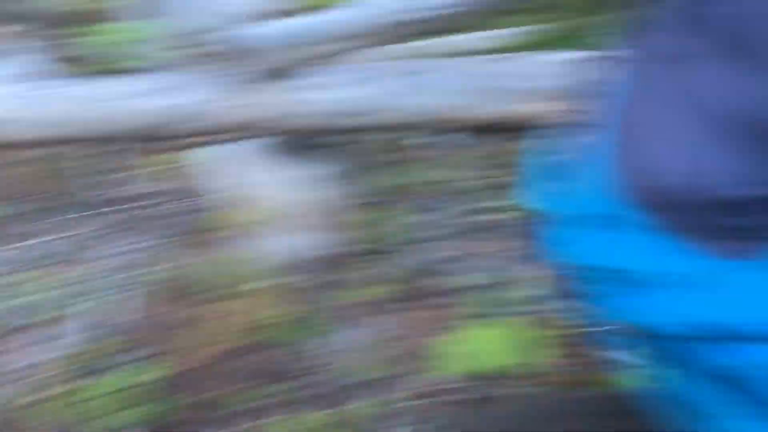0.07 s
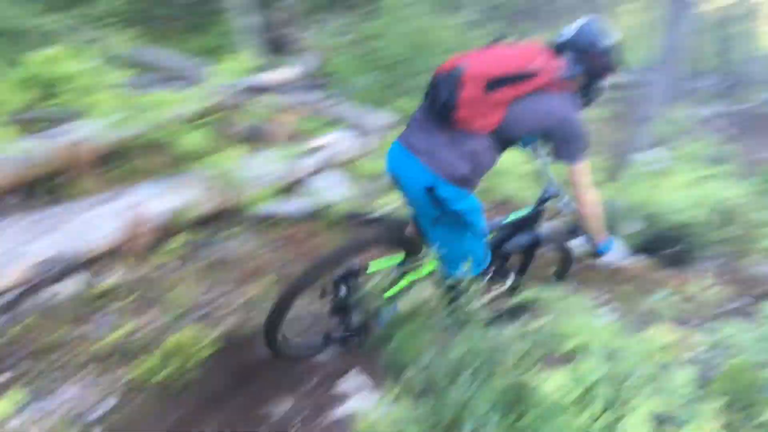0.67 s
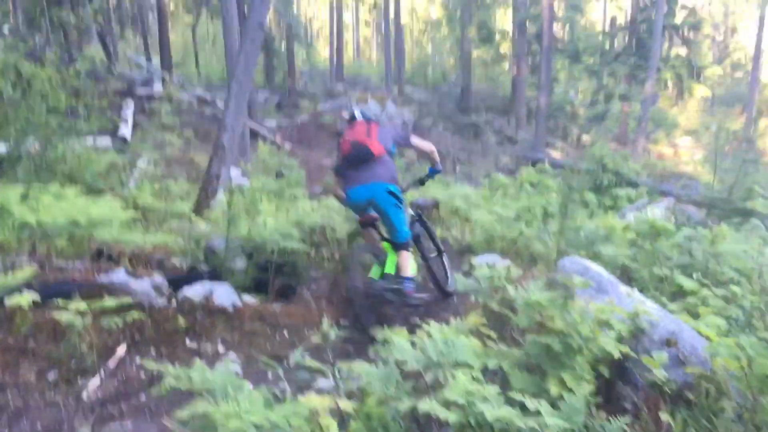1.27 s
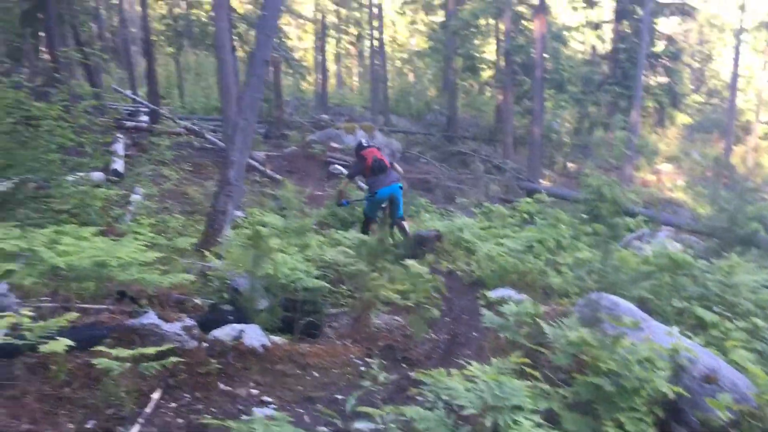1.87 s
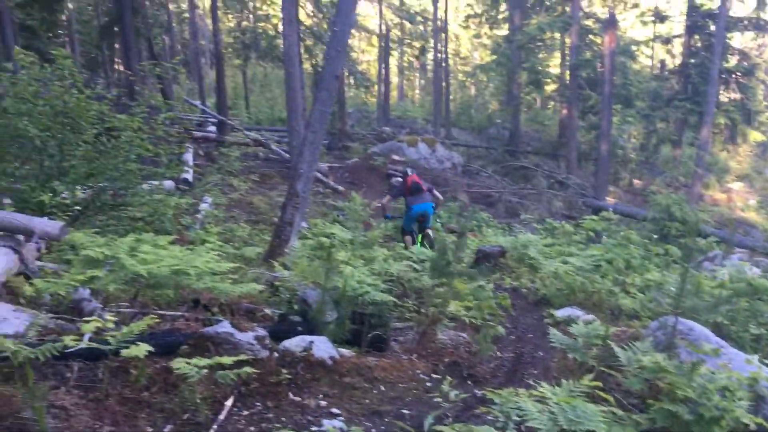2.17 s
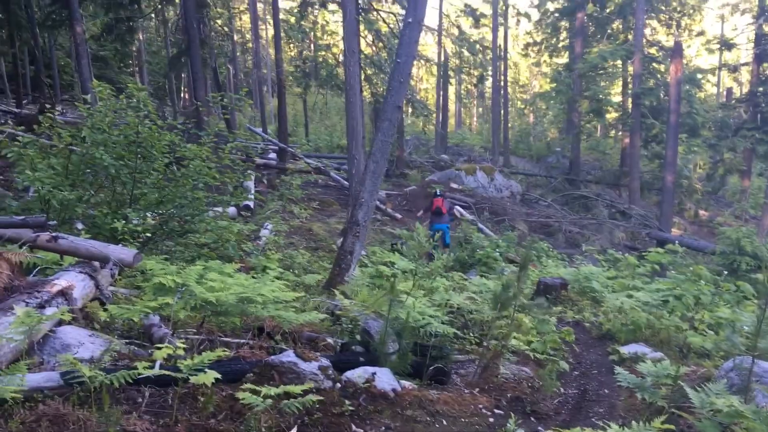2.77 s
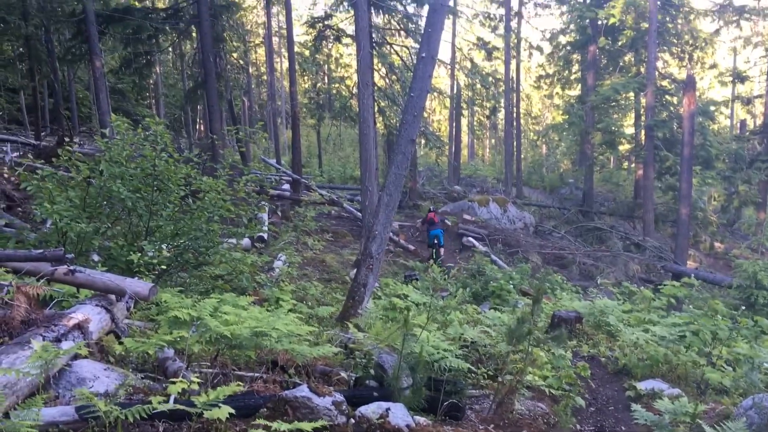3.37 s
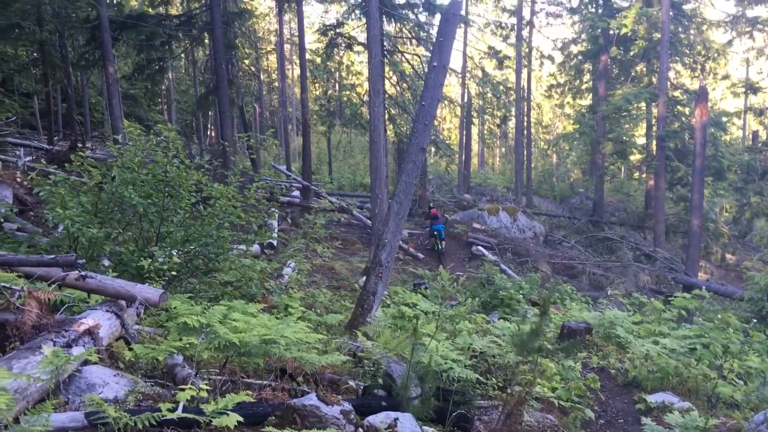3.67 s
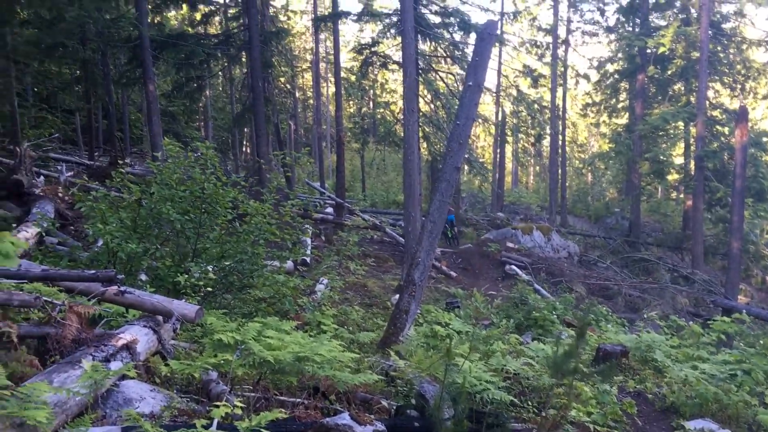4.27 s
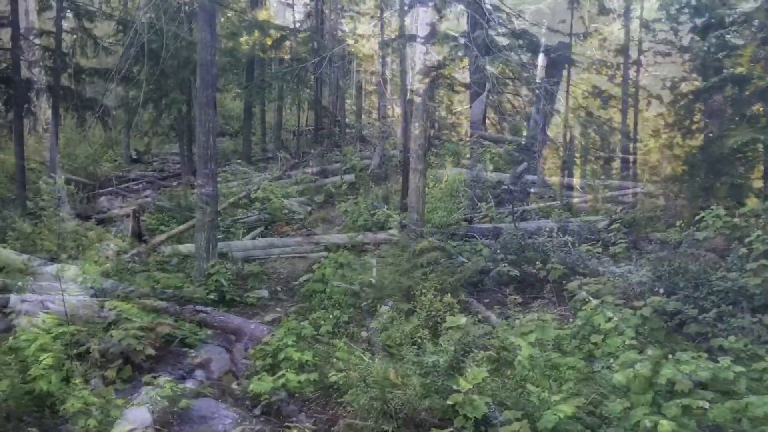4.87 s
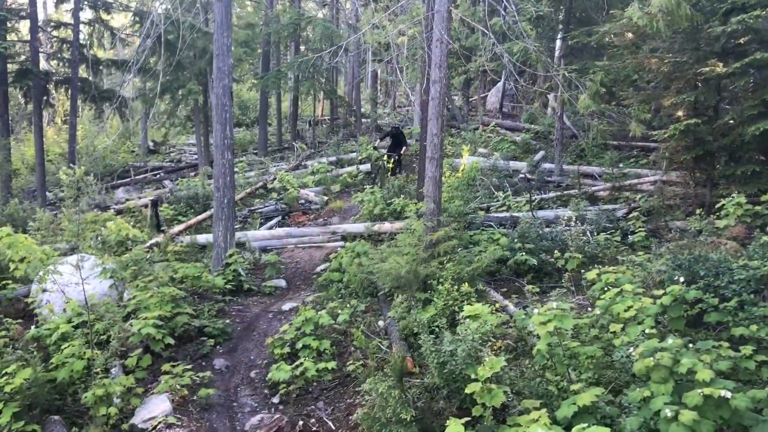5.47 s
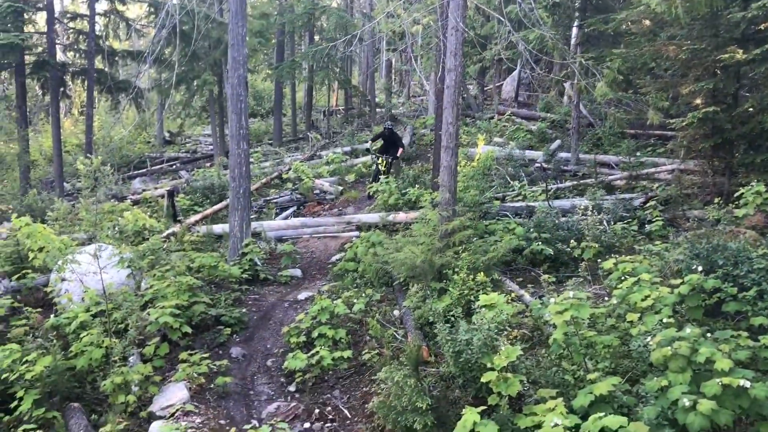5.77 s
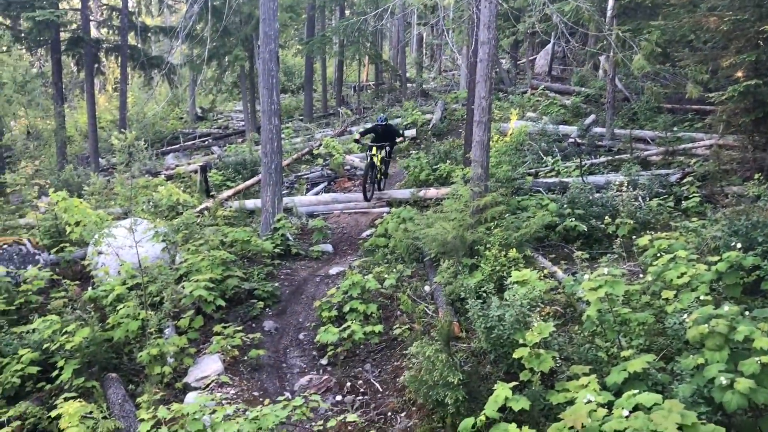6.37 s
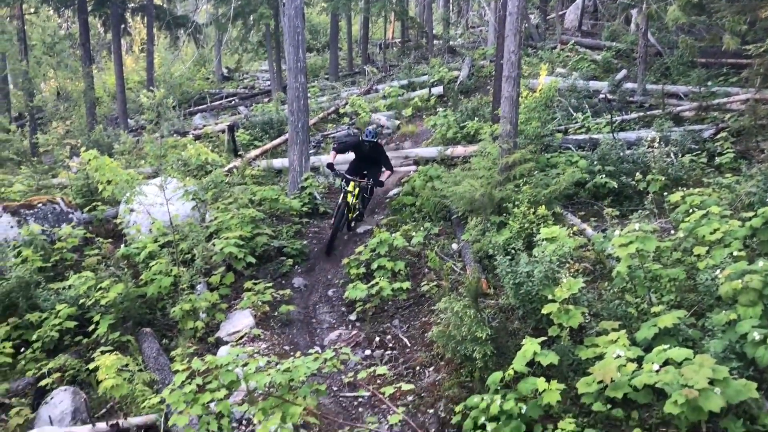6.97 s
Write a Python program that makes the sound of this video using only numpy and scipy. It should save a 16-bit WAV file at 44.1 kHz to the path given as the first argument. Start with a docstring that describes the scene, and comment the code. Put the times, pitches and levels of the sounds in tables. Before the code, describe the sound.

A mountain bike passes close to the microphone right at the start, its tyres crunching on dirt and spraying grit, with low thuds, a brief rush of air and sharp rattles, loudest around 0.3 to 0.5 seconds. It rides away, snapping stones and twigs and clacking over roots. The crunch surges as the tyres dig in at about 1.2 to 1.7 seconds, again near 2.7, and more weakly between 3.3 and 4.3, then fades out by 5 seconds. A second bike fades in at about 5 seconds with a coarser, duller crunch and scattered clacks, growing louder. It goes briefly quiet in the air at 6.6, lands off a log with a thud at 6.7 and is still approaching at the end. Behind the bikes lies a faint forest hush. A small bird gives sharp falling chips near 2, 3, 4 and 5 seconds and one thin call at 4.4, lightly echoing among the trees.

```python
"""A mountain bike crunches close past on a dirt forest trail and rides away; a second one comes down
and lands off a log. Tyres grind soil and spray grit, stones and twigs snap, the ground thuds under
the wheels, and the frames rattle over roots and stones. Behind them, over a faint hush, a small bird
gives sharp falling chips and one thin call, which the trees scatter."""
import sys
import numpy as np
from scipy import signal
from scipy.fft import rfft, irfft
from scipy.io import wavfile
from scipy.ndimage import uniform_filter1d

SR = 44100
rng = np.random.default_rng(int(sys.argv[2]) if len(sys.argv) > 2 else 0)


def persist_wave(psi):
    """Save psi, clipped to +-1, as 16-bit WAV."""
    counts = np.round(np.clip(psi, -1, 1) * 32767).astype(np.int16)
    wavfile.write(sys.argv[1], SR, np.atleast_2d(counts).T)


N = 313992
TIME, FREQS = np.arange(N) / SR, np.fft.rfftfreq(N, 1 / SR)
STONE_BAND_HZ, SAND_BAND_HZ = (350, 7000), (3000, 16000)
CRUNCH_BAND_HZ, GRIT_BAND_HZ = (400, 2500), (8000, 15500)

# tyre-on-dirt spectra by distance: (frequency [Hz], relative level [dB])
NEAR_SPECTRUM = [(110, -34), (180, -11.5), (221, -0.5), (334, -2.5), (535, -5), (610, 0), (839, -3),
                 (1010, -2), (1390, -2), (2030, -7), (2360, -4), (4060, -11), (10400, -16.5), (12800, -12),
                 (16000, -15.5)]
MID_SPECTRUM = [(110, -38), (180, -5.5), (217, -3.5), (262, -16.5), (322, -7.5), (922, -2), (1090, -5),
                (1270, -2.5), (1470, -8), (3560, -8), (4900, -17.5), (5590, -14.5), (10600, -18),
                (13800, -15), (16000, -16.5)]
FAR_SPECTRUM = [(110, -61), (180, -6.5), (305, -22.5), (478, -5.5), (566, -10), (905, -7), (1530, -9.5),
                (1680, -15), (3180, -13.5), (4900, -24.5), (5590, -23), (10600, -24), (13500, -20.5),
                (16000, -26.5)]
# frame and wheel resonances and valleys: (centre [Hz], width [Hz], gain [dB])
FRAME_MODES = [(140, 60, 5), (225, 25, 1.5), (350, 85, -0.5), (590, 120, 2), (1000, 37, 3.5),
               (1140, 62, 3.5), (1310, 62, 1), (1430, 94, 1.5), (1600, 150, 4.5), (1990, 260, 4.5),
               (2400, 270, -6.5), (3500, 1500, 0.5)]


def first_bike(levels_db, sand):
    """Close by, the frame colours the crunch; further off loose dirt carries, then only dull rolling."""
    stones = pebbles(per_s=3500, spread_db=3.5, ring_cycles=2.6, bed=0.87, band_hz=STONE_BAND_HZ)
    near = dirt(colour(NEAR_SPECTRUM) * resonances(FRAME_MODES), stones, sand, split_hz=3800)
    mid = dirt(colour(MID_SPECTRUM), stones, sand, split_hz=6600)
    far = dirt(colour(FAR_SPECTRUM), stones, sand, split_hz=4000)
    to_mid = np.clip((TIME - 0.6) / 0.057, 0, 1)
    to_far = np.clip((TIME - 1.85) / 0.15, 0, 1)
    crunch, spray = (1 - to_mid) * near + (to_mid - to_far) * mid + to_far * far
    return rolling(levels_db, crunch, spray)


# tyre-on-dirt spectrum, approaching: (frequency [Hz], relative level [dB])
APPROACH_SPECTRUM = [(110, -61), (180, -11.5), (217, 3.5), (334, -11), (487, -2.5), (633, -7.5),
                     (905, -3.5), (1990, -15), (3120, -12.5), (4550, -15), (5590, -13), (6500, -18),
                     (13500, -26.5), (15100, -24), (16000, -34)]


def second_bike(levels_db, sand):
    """Coarser crunch, its treble dulled by undergrowth."""
    stones = pebbles(per_s=1700, spread_db=7, ring_cycles=4.7, bed=1, band_hz=STONE_BAND_HZ)
    crunch, spray = dirt(colour(APPROACH_SPECTRUM), stones, sand, split_hz=2940)
    return rolling(levels_db, crunch, spray)


def pebbles(per_s, spread_db, ring_cycles, bed, band_hz, pitches=14, tries=3000):
    """Colliding grains, each ringing briefly at its own pitch, over a noise bed of finer soil."""
    t = np.arange(SR // 50) / SR
    out, power = np.zeros(N), 1e-9
    for hz in np.geomspace(*band_hz, pitches):
        ring = np.sin(2 * np.pi * hz * t) * np.exp(-hz * t / ring_cycles) * hz
        starts = rng.integers(0, N, size=tries)
        size = amp(spread_db * np.minimum(rng.exponential(1, tries), np.pi))
        sign = rng.choice([-1, 1], tries)
        sounding = rng.random(tries) < per_s * N / SR / (tries * pitches)
        impacts = np.bincount(starts, size * sign * sounding, N)
        out += signal.oaconvolve(impacts, ring)[:N]
        power = power + abs(rfft(ring)) ** 2
    whitening = np.interp(FREQS, np.fft.rfftfreq(len(t), 1 / SR), power ** -0.5)
    return unit(unit(shaped(out, whitening)) + bed * rng.standard_normal(N))


def dirt(gain, stones, sand, split_hz):
    """Stones make the crunch below the split, sand the spray above it."""
    low_share = 1 / (1 + (FREQS / split_hz) ** 6)
    crunch = in_band(stones, gain * np.sqrt(low_share), CRUNCH_BAND_HZ)
    spray = in_band(sand, gain * np.sqrt(1 - low_share), GRIT_BAND_HZ)
    return np.array([crunch, spray])


def rolling(levels_db, crunch, spray):
    """Crunch and spray follow the ride; lumps in the trail press the tyres unevenly."""
    crunch_db, grit_db, _ = levels_db
    lumps_db = 2.5 * drift(rate_hz=60)
    return crunch * amp(crunch_db + lumps_db) + spray * amp(grit_db + 0.56 * lumps_db)


def ride(pass_s, speed_m_s, closest_m, at_1m_db, faded_s):
    """Crunch, grit and rumble levels [dB] on a straight path: loss through undergrowth, plus a fade."""
    loss_db_per_doubling, fade_db_per_s = (10, 9, 5.5), 20
    distance_m = np.hypot(closest_m, speed_m_s * (TIME - pass_s))
    distance_db = np.outer(loss_db_per_doubling, np.log2(distance_m))
    return np.array(at_1m_db)[:, None] - distance_db - fade_db_per_s * np.maximum(faded_s, 0)


# tyres biting into rough ground, turns and landings:
# (time [s], length [s], onset [s], crunch lift [dB], grit lift [dB], rumble lift [dB])
TYRE_DIGS = [(0.0, 0.01, 0.01, 12, 7, 19.5), (0.092, 0.18, 0.099, 4.5, 4.5, 4.5),
             (0.258, 0.034, 0.012, 7.5, 9, 13.5), (0.41, 0.058, 0.006, 9, 1, 6.5),
             (0.497, 0.12, 0.01, 5.5, 1, 7), (0.643, 0.27, 0.02, 1, 3.5, -0.5),
             (1.191, 0.088, 0.038, 10.5, 7.5, 6), (1.314, 0.14, 0.03, 11, 7, 11.5),
             (1.497, 0.18, 0.058, 14, 12, 7), (1.672, 0.19, 0.026, 8.5, 4.5, 9.5),
             (2.44, 0.26, 0.16, 2, -8, 8), (2.649, 0.14, 0.1, 14, 4, 14.5),
             (2.781, 0.14, 0.02, 11, 10.5, 7.5), (2.946, 0.12, 0.041, 2.5, 10, -3),
             (3.258, 0.21, 0.015, 11.5, 7, 8.5), (3.475, 0.16, 0.02, 11, 7, 5.5),
             (3.868, 0.16, 0.13, 13.5, 9, 8), (4.072, 0.085, 0.014, 14, 12.5, -1),
             (4.246, 0.067, 0.027, 10, 6.5, -9), (5.42, 0.59, 0.11, 7.5, 9.5, 1),
             (5.768, 0.18, 0.1, 10.5, 7, -2), (6.02, 0.31, 0.077, 11.5, 7.5, 6.5),
             (6.475, 0.015, 0.0065, 4.5, -14.5, 14.5), (6.725, 0.17, 0.011, 11, 10.5, 19),
             (6.914, 0.079, 0.036, 6.5, 13, 8)]
# wheels going light or airborne: (time [s], length [s], unweighting [s], base drop [dB])
WHEEL_HOPS = [(0.308, 0.082, 0.016, 10), (1.108, 0.058, 0.053, 0), (2.154, 0.074, 0.043, 2),
              (3.135, 0.114, 0.03, 4), (6.6, 0.107, 0.1, 14)]


def tyre_load():
    """Crunch, grit and rumble lift [dB]: tyres bite, ease as the suspension settles, go quiet in a hop."""
    sag_db_per_s, touchdown_s = 5, 0.011
    settle_s = np.array([0.028, 0.061, 0.025])[:, None]
    drop_scale = (1.05, 0.91, 1.1)  # grit keeps flying, so drops least
    load_db = np.zeros((3, N))
    for start_s, length_s, onset_s, *lift_db in TYRE_DIGS:
        bite = np.clip(1 + (TIME - start_s) / onset_s, 0, 1)
        sag_db = sag_db_per_s * np.clip(TIME - start_s, 0, length_s)
        settling = np.exp(-np.maximum(TIME - start_s - length_s, 0) / settle_s)
        load_db = np.maximum(load_db, bite * settling * (np.array(lift_db)[:, None] - sag_db))
    for start_s, length_s, unweight_s, drop_db in WHEEL_HOPS:
        takeoff = 1 + (TIME - start_s) / unweight_s
        landing = 1 + (start_s + length_s - TIME) / touchdown_s
        airborne = np.clip(np.minimum(takeoff, landing), 0, 1)
        load_db = load_db * (1 - airborne) - drop_db * np.outer(drop_scale, airborne)
    return load_db


# hollow clack of a bike some way off: (centre [Hz], width [Hz], gain [dB])
CLACK_MODES = [(1180, 800, 7), (2960, 610, 4.5)]
# jolts to the bike: (time [s], length [s], relative level [dB], grit re crunch [dB])
JOLTS = [(0.058, 0.0068, -25, 0), (0.139, 0.011, -23.5, -25), (0.331, 0.0075, -12.5, -12),
         (0.336, 0.0083, -9.5, -13), (0.344, 0.011, -25, -2.5), (0.401, 0.016, -17, -22),
         (0.473, 0.018, -18, -9), (0.507, 0.0039, -40, 10), (0.517, 0.0045, -36.5, 12),
         (0.727, 0.0078, -31.5, -15), (0.782, 0.0087, -42, -9), (1.189, 0.0046, -32, -2.5),
         (1.243, 0.0073, -29, -14), (1.496, 0.0083, -36, -13), (1.518, 0.018, -30.5, -23),
         (1.653, 0.011, -36, 7.5), (2.061, 0.009, -49, -18), (2.105, 0.007, -47.5, 0),
         (2.64, 0.012, -43, -20), (2.707, 0.046, -46, -2), (2.835, 0.017, -46.5, -6),
         (2.952, 0.0036, -49, 9), (2.977, 0.043, -54, 7.5), (3.319, 0.0099, -61, 8.5),
         (3.484, 0.017, -50, -3), (4.069, 0.0074, -50, -11), (4.085, 0.016, -52, 2),
         (4.12, 0.017, -47.5, -2), (4.277, 0.0072, -55, -8), (4.295, 0.01, -48, -8), (5.163, 0.027, -63, 5),
         (5.805, 0.0066, -38, -15), (5.993, 0.021, -41.5, -20), (6.061, 0.033, -43, -18),
         (6.475, 0.01, -49.5, -30), (6.725, 0.011, -40.5, -8), (6.828, 0.005, -46, -2),
         (6.863, 0.008, -38, -17), (6.935, 0.012, -49.5, 4), (6.962, 0.011, -36, -22)]


def rattles():
    """Each jolt shakes out a dense cluster of impacts that ring the frame and stop quickly."""
    attack_s, release_s, close_until_s = 0.0012, 0.00076, 0.75
    stones = grains(per_s=3500, spread_db=1.5, bed=0.7)
    sand = grains(per_s=6000, spread_db=2, bed=0.8)
    frame = resonances(FRAME_MODES)
    far_gain = colour(MID_SPECTRUM) * frame ** 0.2 * resonances(CLACK_MODES)
    close_gain = colour(NEAR_SPECTRUM) * frame / (1 + (FREQS / 7500) ** 4)
    far_crunch, spray = dirt(far_gain, stones, sand, split_hz=4200)
    crunch = np.where(TIME < close_until_s, in_band(stones, close_gain, CRUNCH_BAND_HZ), far_crunch)
    out, t = np.zeros(N), np.arange(SR // 10) / SR
    for start_s, length_s, level_db, grit_db in JOLTS:
        span = (round(start_s * SR) + np.arange(len(t))) % N
        shake = np.minimum(t / attack_s, 1) * np.exp(-np.maximum(t - 0.76 * length_s, 0) / release_s)
        body = crunch[span] / np.sqrt(np.average(crunch[span] ** 2, weights=shake ** 2))
        add(out, start_s, amp(level_db) * shake * (body + amp(grit_db) * spray[span]))
    return amp(-4) * out


def grains(per_s, spread_db, bed):
    """Tiny fractures of uneven size over a noise bed of smaller ones."""
    size = amp(spread_db * np.minimum(rng.exponential(1, N), np.pi + 1))
    clicks = size * rng.choice([-1, 1], N) * (rng.random(N) < per_s / SR)
    return unit(unit(clicks) + bed * rng.standard_normal(N))


# struck stones, twigs and roots: (time [s], peak [dB], pitch [Hz])
TRAIL_SNAPS = [(0.718, -18, 880), (0.786, -20, 2430), (0.889, -21.5, 3050), (0.937, -22, 2540),
               (1.159, -27, 2200), (1.241, -27, 1300), (1.319, -28, 800), (1.326, -30, 3000),
               (1.386, -26, 860), (1.414, -22, 11500), (1.503, -17.5, 3430), (1.525, -26, 1420),
               (1.540, -29, 2000), (1.566, -23, 2800), (1.799, -38, 1500), (2.061, -35.5, 1190),
               (2.089, -39, 12900), (2.122, -43.5, 1140), (3.248, -41.5, 3110), (3.88, -28, 11000),
               (3.948, -37.5, 7040), (3.961, -35, 7100), (4.07, -36, 880), (4.087, -34, 1010),
               (4.278, -33.5, 9400), (5.076, -43, 8950), (5.81, -29.5, 1150), (5.871, -38.5, 900),
               (5.921, -35.5, 2020), (5.995, -36.5, 1010), (6.14, -30, 3000), (6.288, -39, 900),
               (6.198, -29.5, 9400), (6.371, -31.5, 8360), (6.697, -40, 900), (6.868, -30.5, 1050)]


def snaps(rows):
    """A stone or twig rings a cycle or two; bigger pieces sound lower and scatter debris for longer."""
    out, t = np.zeros(N), np.arange(SR // 40) / SR
    for start_s, peak_db, hz in rows:
        cycles = hz * t
        ring = np.sin(2 * np.pi * cycles) * np.exp(-cycles / 0.66)
        settling = np.exp(-t / (0.0015 + 1.2 / hz))
        debris = 0.21 * rng.standard_normal(len(t)) * settling * np.sqrt(hz / 5000)
        snap = ring + signal.fftconvolve(ring, debris)[:len(t)]
        add(out, start_s, amp(peak_db) * snap / abs(snap).max())
    return out


def flicked_stones(crunch_db, per_s=18, low_hz=900, high_hz=5400, tries=400):
    """Tyres flick loose stones aside at random; each snap scales with the crunch at that moment."""
    when, size, pitch, chance = rng.random((tries, 4)).T
    start_s = when * TIME[-1]
    peak_db = np.interp(start_s, TIME, crunch_db) + 2.5 + 6 * np.minimum(-np.log(size), 2)
    hz = low_hz * (high_hz / low_hz) ** pitch
    flicked = chance < per_s * TIME[-1] / tries
    return snaps(np.column_stack([start_s, peak_db, hz])[flicked])


# wheels hitting soft ground: (time [s], peak [dB], pitch [Hz])
WHEEL_THUDS = [(0.147, -17.5, 84.6), (0.249, -26, 137), (0.279, -21, 82), (0.764, -30, 310),
               (0.771, -28, 71), (1.287, -33.5, 151), (1.311, -32.5, 75), (1.387, -32.5, 68),
               (1.852, -34.5, 64.4), (2.722, -34.5, 140), (2.738, -32.5, 310), (2.779, -33, 74),
               (3.01, -41.5, 72), (3.274, -38, 69.6), (3.377, -39.5, 64), (3.413, -39, 93),
               (3.571, -42.5, 183), (3.825, -41, 75), (3.971, -38, 86), (4.258, -43.5, 190),
               (6.735, -36.5, 93.6), (6.767, -42, 75), (6.805, -39, 220)]


def thuds():
    """Heavily damped ground thumps; the pitch drops as the soil gives."""
    out, t = np.zeros(N), np.arange(SR // 8) / SR
    for start_s, peak_db, hz in WHEEL_THUDS:
        cycles = hz * t
        swell = cycles / 0.44
        tone = np.sin(2 * np.pi * cycles / (1 + 0.022 * cycles))
        add(out, start_s, amp(peak_db) * swell * np.exp(1 - swell) * tone)
    return out


# ground and air rumble: (frequency [Hz], relative level [dB])
RUMBLE_SPECTRUM = [(20, -34.5), (32, -7.5), (45, -8), (62, 6), (90, -1.5), (125, -3.5), (190, -3),
                   (260, -12.5), (400, -17.5), (900, -57)]


def rumble(first_db, second_db):
    """Low noise of wheels on the ground, plus the first rider's wake and a breeze on the microphone."""
    wake_s, wake_width_s, wake_db, breeze_db = 0.17, 0.15, -32, -65
    analytic = signal.hilbert(shaped(rng.standard_normal(N), colour(RUMBLE_SPECTRUM)))
    levelled = analytic.real / np.sqrt(uniform_filter1d(abs(analytic) ** 2, size=1500))
    wake = amp(wake_db) * np.exp(-((TIME - wake_s) / wake_width_s) ** 2)
    power = amp(first_db) ** 2 + amp(second_db) ** 2 + wake ** 2 + amp(breeze_db) ** 2
    return unit(levelled) * np.sqrt(power)


# chips: (time [s], relative level [dB], throat resonance width [Hz])
BIRD_CHIPS = [(1.9483, -38, 468), (3.089, -34, 449), (3.9060, -42.5, 600), (5.0420, -47, 1690)]
# call contour: (time [s], pitch [Hz], relative level [dB])
BIRD_CALL = [(4.392, 9800, -76.5), (4.395, 9530, -61), (4.399, 7100, -54), (4.405, 5970, -58),
             (4.41, 7240, -50.5), (4.414, 6460, -53.5), (4.422, 6460, -63.5)]


def bird(throat_hz=6000):
    """Chips sweep down through the throat resonance; the call dips and rises; trees scatter both."""
    voice, t = np.zeros(N), np.arange(SR // 200) / SR
    sweep_hz = 10300 * np.exp(-t / 0.00426)
    chip = glide(sweep_hz) * signal.windows.tukey(len(t), 0.3)
    for start_s, level_db, width_hz in BIRD_CHIPS:
        throat = 1 / (1 + ((sweep_hz - throat_hz) / width_hz) ** 2) + 0.08
        add(voice, start_s, amp(level_db) * throat * chip)
    call_s, call_hz, call_db = np.transpose(BIRD_CALL)
    t = np.arange(call_s[0], call_s[-1], 1 / SR)
    call = amp(np.interp(t, call_s, call_db) - 1) * glide(np.interp(t, call_s, call_hz))
    add(voice, call_s[0], call)
    carried = shaped(voice, 1 / (1 + ((FREQS - 6400) / 1100) ** 2))  # strongest pitches echo furthest
    leaves = amp(2.5) * scatter(carried, t60_s=0.023, delay_s=0.002)
    trunks = amp(-6.5) * scatter(carried, t60_s=0.52, delay_s=0.0097)
    return voice + leaves + trunks


# forest background: (frequency [Hz], relative level [dB])
HUSH_SPECTRUM = [(18, -30.5), (30, -8.5), (64, -3.5), (124, -8.5), (499, -13), (760, -15.5), (844, -18),
                 (1810, -22), (2120, -26), (3140, -23), (4910, -36), (14800, -34), (16000, -54)]


def forest_hush(level_db=-66.5):
    """Faint steady noise, strongest in the bass."""
    return amp(level_db) * unit(shaped(rng.standard_normal(N), colour(HUSH_SPECTRUM)))


def scatter(x, t60_s, delay_s):
    """Sparse decaying reflections off the trees, with taps of unit energy."""
    t = np.arange(SR // 2) / SR
    taps = rng.choice([-1, 1], len(t)) * (rng.random(len(t)) < 0.1) * (t > delay_s)
    taps = taps * np.exp(-np.log(1000) * t / t60_s)
    return signal.fftconvolve(x, taps / (np.linalg.norm(taps) + 1e-20))[:N]


def amp(db):
    """Decibels to gain."""
    return 10 ** (np.asarray(db) / 20)


def unit(x):
    """Scale to rms 1."""
    return x / np.sqrt(np.mean(x ** 2) + 1e-20)


def glide(hz):
    """Sine following a pitch curve."""
    return np.sin(2 * np.pi * np.cumsum(hz) / SR)


def colour(points):
    """Gain per frequency from spectrum points."""
    hz, db = np.transpose(points)
    return amp(np.interp(np.log(FREQS + 1), np.log(hz), db))


def resonances(rows):
    """Gain per frequency from peaks and dips."""
    return amp(sum(db / (1 + (2 * (FREQS - hz) / width_hz) ** 2) for hz, width_hz, db in rows))


def shaped(x, gain):
    """Filter by a gain per frequency."""
    return irfft(rfft(x) * gain, N)


def in_band(drive, gain, band_hz):
    """Colour a white drive so the band has rms 1."""
    inside = (FREQS > band_hz[0]) & (FREQS < band_hz[1])
    return shaped(drive, gain / np.sqrt(np.mean(gain ** 2 * inside)))


def drift(rate_hz):
    """Smooth random wander, rms 1."""
    return unit(shaped(rng.standard_normal(N), np.exp(-(FREQS / rate_hz) ** 2)))


def add(mix, start_s, sound):
    """Mix a sound in at start_s."""
    part = mix[max(round(start_s * SR), 0):][:len(sound)]
    part += sound[:len(part)]


def scene():
    """One bike passes, rides away and fades out; the second fades in and approaches; a bird calls."""
    fade_out_start_s, fade_in_end_s = 4.46, 5.12
    load_db = tyre_load()
    first_db = load_db + ride(pass_s=0.42, speed_m_s=4.96, closest_m=1.0,
                              at_1m_db=(-33, -35.5, -39.5), faded_s=TIME - fade_out_start_s)
    second_db = load_db + ride(pass_s=8.166, speed_m_s=4.7, closest_m=0.86,
                               at_1m_db=(-30.5, -48.5, -54.5), faded_s=fade_in_end_s - TIME)
    sand = pebbles(per_s=4200, spread_db=4, ring_cycles=7, bed=0.9, band_hz=SAND_BAND_HZ)
    tyres = first_bike(first_db, sand) + second_bike(second_db, sand)
    ground = rumble(first_db[2], second_db[2]) + thuds()
    forest = forest_hush() + bird()
    knocks = rattles() + snaps(TRAIL_SNAPS) + flicked_stones(np.maximum(first_db[0], second_db[0]))
    echoes = amp(-11) * scatter(knocks, t60_s=0.13, delay_s=0.0058)
    return (tyres + ground + knocks + echoes + forest)[None]


# treble peaks and dips over the whole scene: (centre [Hz], width [Hz], gain [dB])
TREBLE_SHAPE = [(4110, 600, 1), (4910, 320, -2.5), (7800, 700, -2.5), (10540, 400, -5), (14200, 2200, -1.5)]


def record(dry):
    """Small microphone: uneven treble, bass cut, band limit."""
    bass_cut_hz, band_limit_hz = 33, 15850
    highpass = FREQS ** 3 / np.sqrt(FREQS ** 6 + bass_cut_hz ** 6)
    heard = shaped(dry, resonances(TREBLE_SHAPE) * highpass)
    lowpass = signal.firwin(401, band_limit_hz, window=("kaiser", 8), fs=SR)
    return signal.oaconvolve(heard, lowpass[None], "same")


dry = scene()
out = record(dry)
persist_wave(out)
```